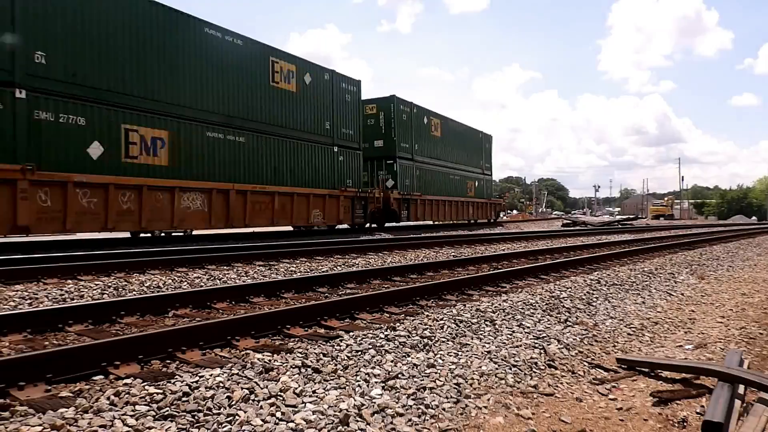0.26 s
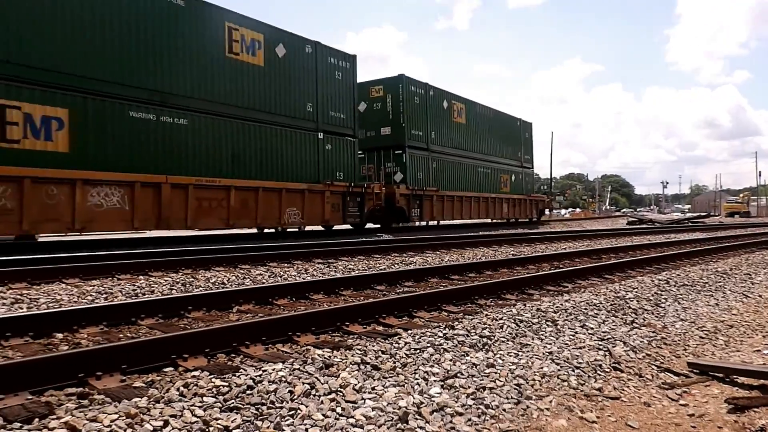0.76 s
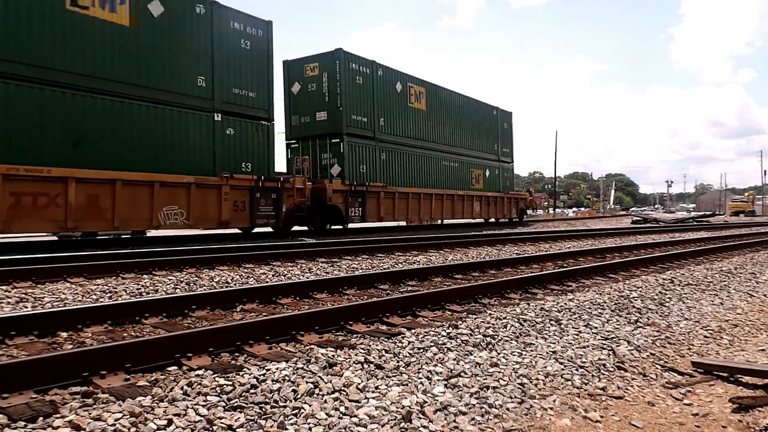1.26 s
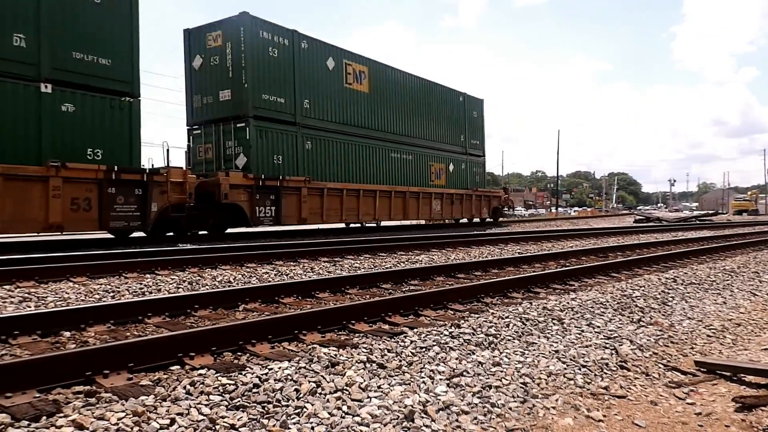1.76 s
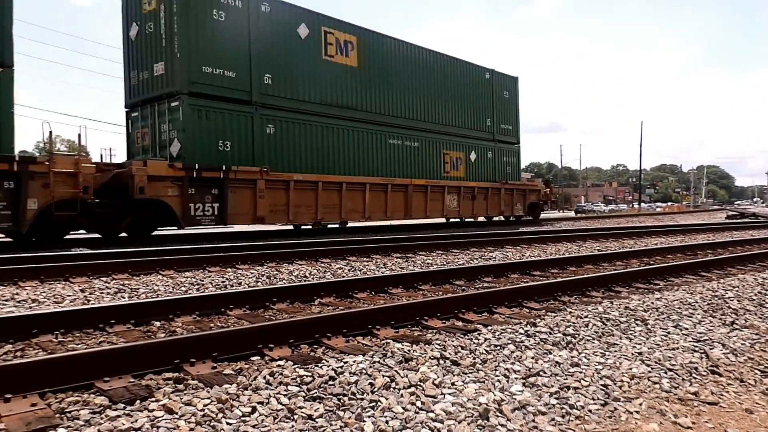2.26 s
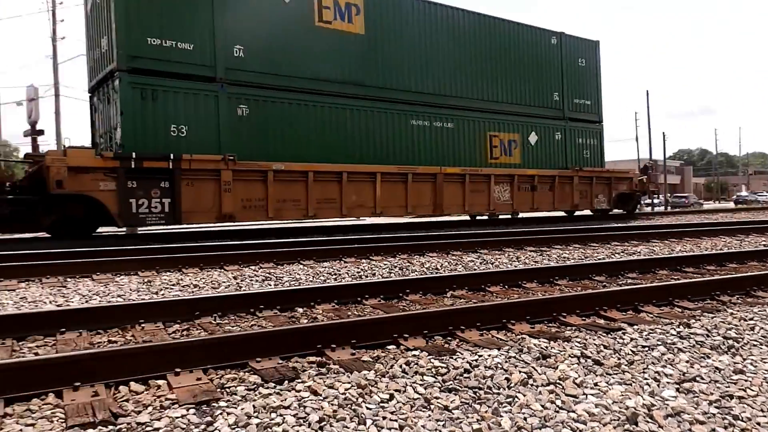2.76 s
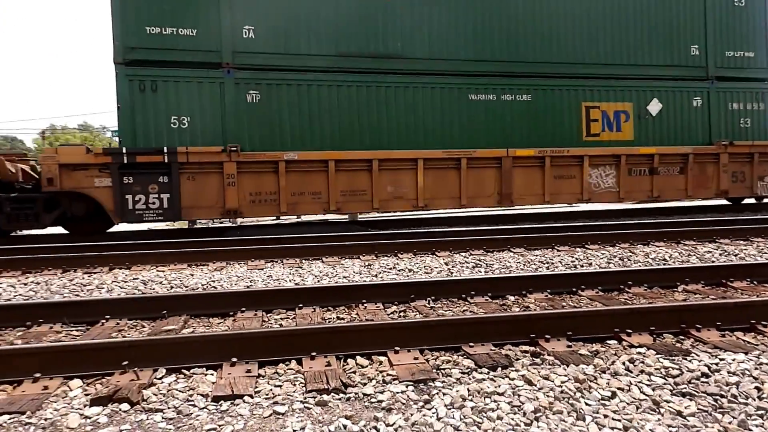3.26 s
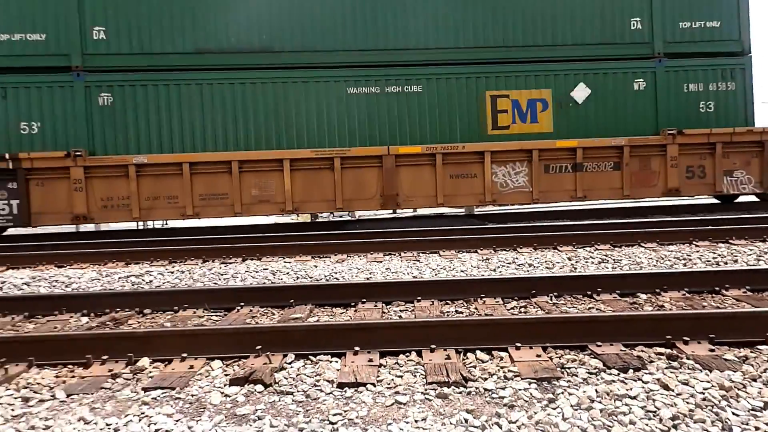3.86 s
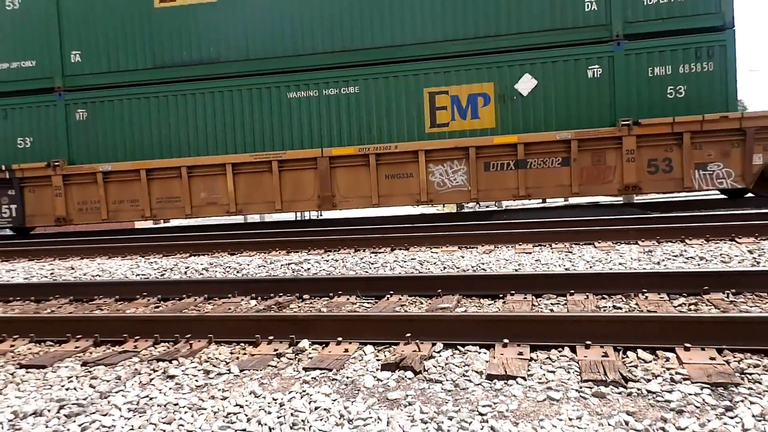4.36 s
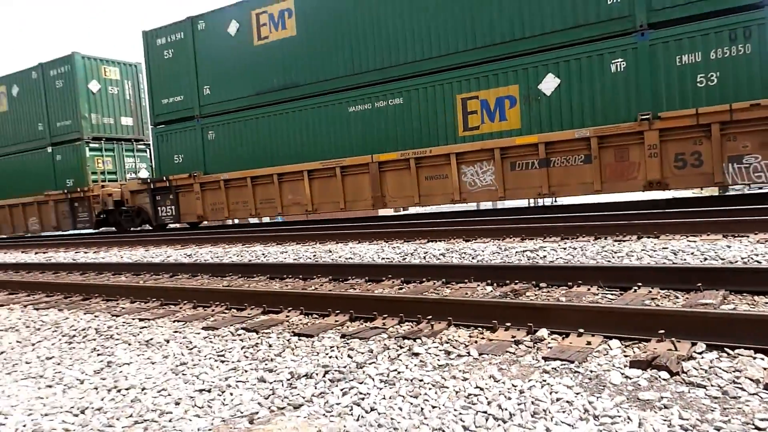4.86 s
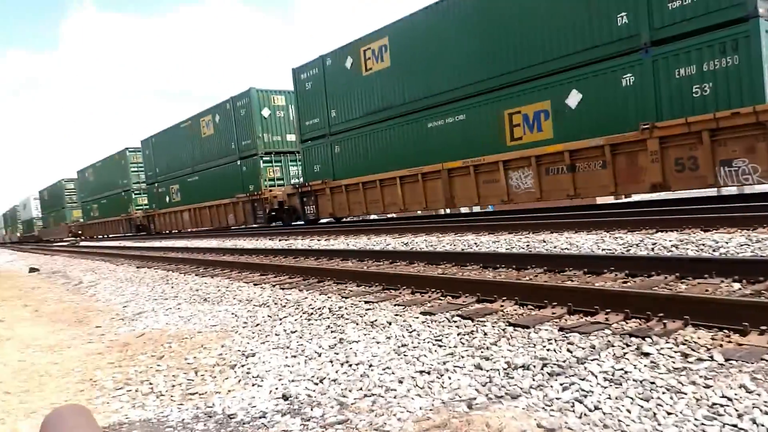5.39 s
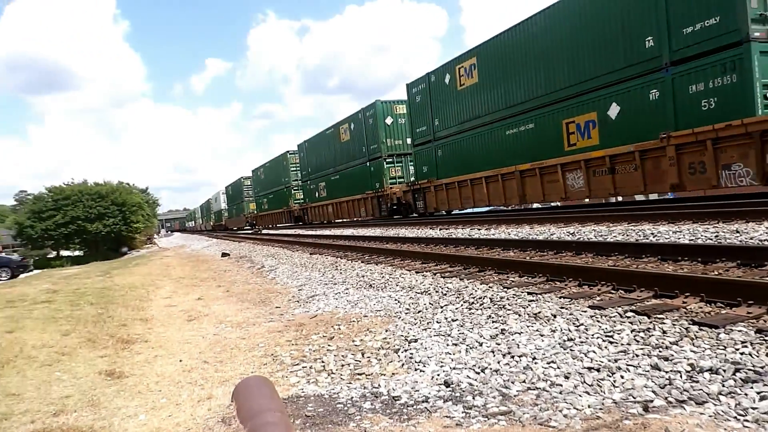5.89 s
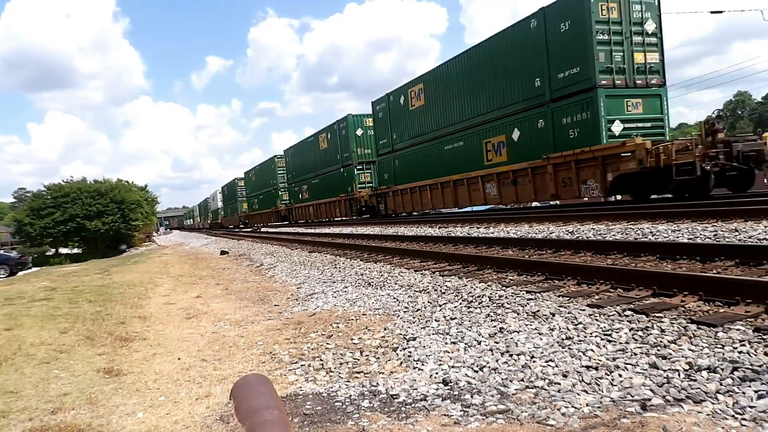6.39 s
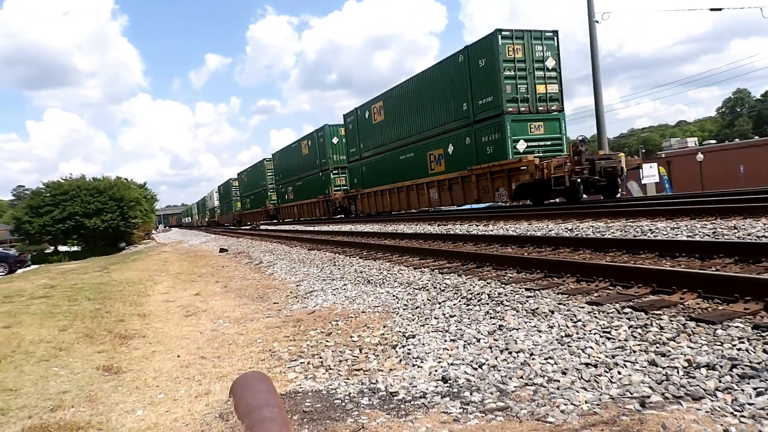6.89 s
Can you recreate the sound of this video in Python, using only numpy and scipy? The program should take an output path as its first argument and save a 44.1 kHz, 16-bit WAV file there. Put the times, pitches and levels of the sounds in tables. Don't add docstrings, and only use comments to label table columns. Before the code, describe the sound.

Close steel wheels screech through a curve in shifting overlapping tones, increasingly broken by blustery wind thumps, ending in faint scrape and gusts.

```python
import sys
import numpy as np
from scipy import signal
from scipy.fft import rfft, irfft, next_fast_len
from scipy.io import wavfile
from scipy.ndimage import uniform_filter1d, map_coordinates

SR = 44100
rng = np.random.default_rng(int(sys.argv[2]) if len(sys.argv) > 2 else 0)


def digitize_waveform(pressure):
    field = np.atleast_2d(pressure).T
    bounded = np.clip(field, -1, 1)
    quanta = np.round(bounded * 32767).astype(np.int16)
    wavfile.write(sys.argv[1], SR, quanta)


def gain_from_db(level_db):
    decades = np.asarray(level_db, float) / 20
    return 10 ** decades


N = 314860

# mode_hz, level_db
LEADING_MODES = [(1545, -33.5), (2019, -34.5), (2665, -34.5), (3257, -35.5), (3817, -41.5), (4183, -33),
                 (5706, -36.5), (6508, -38.5), (6837, -35.5), (7364, -36.5), (7736, -40), (8366, -38),
                 (9534, -38), (10471, -52), (11676, -66)]
FOLLOWING_MODES = [(2070, -39), (2640, -42), (3205, -39), (3854, -38), (4110, -37), (4395, -35),
                   (5600, -43), (5880, -35), (6336, -44), (6670, -36), (6900, -37), (7687, -38),
                   (8420, -42), (8580, -38), (9415, -36), (10265, -37), (11030, -48), (11750, -47),
                   (12651, -48), (13190, -43), (14373, -53), (15600, -54)]
# time_s, following_share_0_1, doppler_ratio, ringing_0_1
PASSING = [
    (0, .1, 1.017, 1),
    (1.2, .2, 1.015, 1),
    (2, .8, 1.009, 1),
    (3, .95, 1, 1),
    (5, .95, .98, .9),
    (5.4, .95, .977, .4),
    (6.4, .95, .975, .3),
    (6.55, .95, .974, .1),
    (7.14, .95, .974, .1),
]
# time_s, force_db
FLANGE_FORCE = [(0.0, -16.5), (0.45, -13), (0.7, -17.5), (1.3, -13.5), (1.6, -13.5), (1.92, -16),
                (2.6, -15), (3.15, -18.5), (3.34, -14), (3.54, -19), (4.1, -23.5), (4.25, -18.5),
                (4.8, -16.5), (5.5, -25), (6.0, -32.5), (6.4, -20.5), (6.6, -32.5), (7.13, -29)]
# time_s, over_slow_force_db
FORCE_SWINGS = [(0.82, 3.5), (1.2, 2), (2.29, -3.5), (5.38, 3.5), (5.67, 7.5), (5.86, 6.5), (6.16, 1),
                (6.38, -1), (6.51, 1), (6.6, -2), (6.67, 6), (6.94, 4), (7.1, -2)]
# time_s, turn_0_1
PORT_TURN = [(0.0, 0.22), (0.5, 0.01), (0.8, 0.17), (1.2, 0.07), (1.9, 0.34), (2.6, 0.08), (3.3, 0.21),
             (4.0, 0.11), (4.55, 0.5), (5.1, 0.11), (5.8, 0.49), (6.2, 0.5), (6.42, 0.65), (6.7, 0.7),
             (7.13, 0.84)]
# freq_hz, density_db_per_hz
ROLL_SPECTRUM = [(300, -18), (500, -21), (800, -10.5), (1200, -8), (1700, -4.5), (2200, -2), (2900, -7.5),
                 (4000, -20)]
GRIND_SPECTRUM = [(2200, -17.5), (3000, -1), (4200, 4.5), (4800, 4), (5400, 1.5), (6200, -0.5),
                  (7200, -9.5), (9500, -16.5)]
FIZZ_SPECTRUM = [(6000, -7), (7500, -1.5), (9000, -3), (11000, 2.5), (13000, -0.5), (15600, -7)]
# start_s,
# length_s, pitch_hz, level_db
SQUEALS = [(0.3, .14, 4190, -26), (0.7, .85, 3233, -26), (0.6, .31, 4166, -27), (0.78, .18, 1560, -29),
           (0.84, .29, 2667, -29), (1.13, .45, 1547, -25), (1.99, .8, 4130, -21.5),
           (2.2, .41, 3210, -30), (2.77, .25, 2143, -32), (2.44, .44, 4382, -20.5),
           (3.2, .6, 4349, -30), (3.6, .25, 3131, -34), (3.5, .25, 2602, -33), (3.6, .52, 4039, -23),
           (4.17, .5, 4029, -27), (4.4, .45, 2028, -29), (4.82, .31, 3128, -28), (4.72, .62, 4013, -26),
           (2.62, .3, 3860, -29), (0.05, .3, 1550, -33), (3.2, .2, 4385, -27), (4.17, .07, 2700, -30),
           (0.42, .3, 5710, -27), (0.47, .24, 6467, -30), (1.12, .18, 5720, -26),
               (1.31, .43, 7735, -27), (1.9, .36, 7702, -31), (2.45, .35, 7630, -32), (2.4, .36, 5872, -23),
               (2.5, .38, 6841, -29), (2.84, .19, 7689, -25), (2.97, .25, 5922, -30),
               (3.04, .13, 6932, -25), (3.07, .21, 7721, -32), (3.45, .3, 7532, -34),
               (3.33, .48, 5788, -29), (3.3, .31, 6652, -21), (4.14, .3, 7478, -35), (4.17, .39, 5816, -29),
               (4.3, .32, 6591, -27), (4.68, .46, 7455, -30), (0.3, .2, 7360, -28),
           (2.26, .67, 8554, -29), (2.3, .48, 13211, -30), (2.48, .28, 10328, -34),
                (2.43, .27, 9433, -30), (2.8, .33, 13137, -36), (2.82, .3, 9416, -26),
                (2.8, .58, 10255, -26), (2.95, .45, 8395, -32), (3.14, .28, 8497, -33),
                (3.36, .16, 10192, -27), (3.53, .21, 8412, -29), (3.79, .39, 10135, -26),
                (4.15, .55, 8360, -36), (4.22, .33, 10107, -32), (4.67, .15, 11415, -36),
                (4.74, .24, 8615, -31), (4.96, .15, 10078, -30),
           (5.16, .11, 4628, -34), (5.31, .17, 4548, -31), (5.3, .26, 2019, -36),
               (5.47, .14, 3140, -38), (5.62, .22, 4000, -34), (5.62, .3, 1990, -35),
               (5.64, .17, 7180, -40), (5.98, .22, 2470, -35), (6.18, .12, 4530, -32),
               (6.22, .16, 6600, -39), (6.12, .26, 3265, -35), (6.19, .1, 2840, -31),
               (6.18, .15, 1962, -29)]
# start_s, length_s, pitch_hz, level_db
CHIRPS = [(0.02, 0.06, 6630, -29), (0.12, 0.16, 3190, -29), (0.46, 0.07, 5710, -21),
          (0.46, 0.11, 6600, -27), (0.46, 0.18, 3170, -27), (0.56, 0.06, 4220, -25),
          (0.57, 0.07, 3990, -27), (0.82, 0.08, 3130, -27), (0.92, 0.09, 7750, -30),
          (0.94, 0.07, 2670, -25), (1.15, 0.1, 3110, -26), (1.15, 0.12, 6510, -27),
          (1.19, 0.14, 5630, -26), (1.42, 0.1, 3260, -26), (1.47, 0.07, 2010, -27),
          (1.5, 0.12, 2670, -26), (1.59, 0.06, 4440, -27), (1.61, 0.09, 3240, -27),
          (1.72, 0.17, 9550, -31), (1.76, 0.15, 2790, -29), (1.92, 0.15, 6910, -29),
          (1.92, 0.25, 8640, -32), (2.06, 0.08, 2000, -29), (2.35, 0.06, 3770, -29),
          (2.51, 0.09, 6000, -27), (2.67, 0.1, 3210, -29), (2.69, 0.1, 5980, -28),
          (2.69, 0.14, 7750, -30), (2.72, 0.14, 9410, -27), (2.77, 0.15, 5830, -29),
          (2.8, 0.13, 2090, -29), (2.89, 0.06, 4430, -26),
          (2.92, 0.19, 6740, -31), (3.0, 0.06, 4080, -29), (3.08, 0.12, 7680, -31),
               (3.09, 0.06, 6930, -24), (3.29, 0.1, 6770, -27), (3.3, 0.08, 4280, -26),
               (3.3, 0.21, 7550, -28), (3.43, 0.09, 10190, -25), (4.17, 0.08, 7470, -32),
               (4.18, 0.14, 2140, -33), (4.29, 0.07, 4020, -24), (4.51, 0.09, 4680, -29),
               (4.64, 0.06, 4010, -28), (4.65, 0.14, 5780, -31), (4.7, 0.32, 6680, -32),
               (4.72, 0.17, 8620, -26), (4.92, 0.07, 7450, -29), (4.99, 0.08, 10080, -28),
               (5.13, 0.16, 10060, -37), (5.14, 0.16, 6570, -34), (5.27, 0.07, 4620, -39),
               (5.34, 0.19, 3990, -33), (5.42, 0.06, 4540, -33), (5.43, 0.06, 3020, -37),
               (5.65, 0.11, 6080, -37), (5.68, 0.07, 3180, -33), (5.68, 0.13, 4540, -39),
               (5.73, 0.1, 3910, -41), (5.88, 0.07, 3210, -43), (5.89, 0.07, 2960, -39),
               (6.09, 0.28, 4640, -40), (6.5, 0.08, 4000, -44)]
# time_s, peak_db, swing_hz
POPS = [(2.187, -7.5, 455), (2.206, -4.5, 406), (2.927, -2, 372), (3.359, -4, 436), (3.453, -6.5, 390),
        (3.481, -5, 440), (3.535, -4.5, 390), (3.583, -5.5, 274), (3.895, -5.5, 403), (3.965, -1, 488),
        (4.057, -8, 383), (4.97, -11, 327), (5.197, -6, 304), (5.22, -6, 373), (5.252, -10, 181),
        (5.285, -1.5, 271), (5.297, -0.5, 302), (5.424, -1.5, 287), (5.474, -7.5, 275), (5.653, -4, 252),
        (5.698, -10, 317), (5.711, -1.5, 305), (5.769, 1, 327), (5.814, -3.5, 296), (5.858, -2, 318),
        (6.077, -2.5, 332), (6.439, -13, 244), (6.459, 0, 249), (6.537, -2.5, 352), (7.059, 2, 300),
        (1.206, -17, 243), (1.443, -15, 218), (1.518, -18, 294), (2.134, -13, 300),
                  (2.215, -14, 310), (2.373, -15, 357), (2.394, -11, 330), (2.414, -13, 279),
                  (2.434, -16, 268), (2.448, -12, 310), (2.458, -11, 363), (2.473, -15, 273),
                  (2.522, -11, 259), (2.532, -14, 284), (2.75, -20, 182), (2.873, -13, 290),
                  (2.892, -11, 536), (2.917, -10, 347), (2.937, -4, 558), (3.005, -10, 306),
                  (3.042, -10, 344), (3.215, -13.5, 261), (3.316, -6, 560), (3.325, -5, 544),
                  (3.338, -20, 311), (3.35, -16, 353), (3.398, -9, 377), (3.512, -13, 306),
                  (3.544, -8, 500), (3.575, -12, 344), (3.593, -6, 522), (3.69, -16, 253), (3.698, -8, 277),
                  (3.795, -9, 382), (3.807, -12, 308), (3.852, -16, 423), (3.879, -19, 292),
                  (3.905, -8, 350), (3.939, -12, 272), (4.012, -5, 326), (4.036, -22, 343),
                  (4.079, -13, 300), (4.091, -14, 452), (4.114, -10, 288), (4.131, -8, 437),
                  (4.138, -12, 259), (4.152, -5, 507), (4.165, -7, 419), (4.199, -6, 272),
                  (4.245, -11, 496), (4.253, -8, 400), (4.267, -12, 507), (4.296, -15, 312),
                  (4.306, -8, 532), (4.373, -16, 388), (4.409, -10.5, 387), (4.694, -7.5, 400),
                  (4.832, -13, 207), (4.841, -15, 511), (4.851, -7, 370),
        (4.875, -10, 388), (4.912, -9, 241), (4.925, -5.5, 553), (4.943, -9, 278),
                 (4.987, -8, 217), (5.011, -7.5, 358), (5.033, -9, 281), (5.045, -13, 277),
                 (5.063, -11, 297), (5.089, -9, 257), (5.108, -4, 376), (5.125, -6, 247), (5.135, -17, 250),
                 (5.151, -15, 216), (5.175, -12, 277), (5.182, -17, 395), (5.23, -10, 200),
                 (5.239, -12, 304), (5.272, -4, 257), (5.325, -11, 251), (5.364, -17, 209),
                 (5.382, -14, 300), (5.411, -12, 252), (5.44, -23, 285), (5.458, -6, 200),
                 (5.486, -22, 252), (5.498, -9, 282), (5.508, -6, 377), (5.517, -6.5, 314),
                 (5.535, -9, 264), (5.568, -7, 181), (5.577, -11, 302), (5.598, -12, 213), (5.61, -11, 215),
                 (5.626, -6, 312), (5.663, -5.5, 275), (5.678, -12, 270), (5.686, -8, 367), (5.73, -3, 305),
                 (5.739, -7, 308), (5.757, -10, 282), (5.78, -15, 382), (5.802, -5, 313), (5.893, -14, 226),
                 (5.905, -14, 336), (5.922, -8, 338), (6.206, -12, 222), (6.318, -13, 228),
                 (6.359, -9, 236), (6.381, -8, 239), (6.568, -19, 185), (6.586, -8, 238), (6.602, -17, 281),
                 (6.733, -15, 232), (6.808, -7.5, 223), (6.948, -14, 310), (6.974, -18, 186),
                 (7.013, -21, 260), (7.043, -15, 256), (7.072, -11, 274)]
# peak_s, peak_db, rise_s
GUSTS = [(1.3, -49, 0.69), (1.98, -27.5, 0.083), (2.199, -18, 0.065), (2.4, -30, 0.037),
         (2.5, -25.5, 0.081), (2.93, -22, 0.042), (3.03, -33, 0.087), (3.21, -34, 0.036), (3.34, -26, 0.11),
         (3.48, -14, 0.059), (3.69, -17.5, 0.041), (3.93, -22, 0.3), (4.07, -18, 0.15), (4.25, -25, 0.32),
         (4.68, -32, 0.086), (4.97, -16.5, 0.099), (5.119, -15, 0.062), (5.23, -12, 0.11),
         (5.47, -13.5, 0.082), (5.58, -26, 0.077), (5.7, -19.5, 0.18), (5.91, -20, 0.067),
         (6.25, -26.5, .2), (6.4, -19, 0.17), (6.45, -15, 0.036), (6.75, -35, 0.27), (7.0, -23.5, 0.13),
         (7.06, -12.5, 0.047)]
# freq_hz, density_db_per_hz
BUFFET_SPECTRUM = [(35, -47), (60, -10), (144, 0.5), (334, -2.5), (691, -13), (899, -18), (1070, -23),
                   (1200, -26), (1560, -45), (2640, -120)]
# freq_hz, density_db_per_hz
RUMBLE_SPECTRUM = [(13, -57), (22, -28), (58, -9.5), (134, 0.5), (258, -9), (370, -16.5), (422, -14.5),
                   (700, -20.5), (910, -24), (1540, -120)]
LOST_SINGLE = [.531, .592, 1.065, 1.257, 1.321, 1.469, 1.576, 2.557, 2.813, 3.111, 3.622, 3.689, 3.75,
               3.924, 4.029, 4.2, 4.969, 5.117, 5.245, 5.396, 5.907, 6.206, 6.377, 6.931]
LOST_DOUBLE = [
    .84,
    2.719,
]


def unit(x):
    return x / np.sqrt(np.mean(x ** 2) + 1e-20)


def curves(rows):
    time_s, *columns = np.transpose(rows)
    return [np.interp(np.arange(N) / SR, time_s, column) for column in columns]


def slow(rule):
    t = np.arange(0, N / SR + .002, .002)
    return np.interp(np.arange(N) / SR, t, rule(t))


def wobble(rate_hz, size=N):
    knots = rng.standard_normal(2000)
    return map_coordinates(knots, [np.arange(size) * rate_hz / SR], mode="wrap")


def filtered(x, response):
    size = next_fast_len(N + 8192)
    gain = response(np.fft.rfftfreq(size, 1 / SR))
    return irfft(rfft(x, size) * gain, size)[:N]


def coloured(x, points):
    f, db = np.transpose(points)
    return unit(filtered(x, lambda hz: gain_from_db(np.interp(np.log(hz + 1), np.log(f), db, -120, -120))))


def patchy(depth_db, bins, frames):
    z = signal.stft(rng.standard_normal(N + 512), nperseg=512)[2]
    field = uniform_filter1d(rng.standard_normal(z.shape), bins, axis=0)
    field = uniform_filter1d(field, frames, axis=1)
    return signal.istft(z * gain_from_db(depth_db * unit(field)), nperseg=512)[1][:N]


def rolling_wheels():
    force_db, turn = flange_force_db(), curves(PORT_TURN)[0]
    swing_db = force_db - uniform_filter1d(force_db, SR)
    roll_db = -6.5 + 15.5 * turn - 0.31 * swing_db
    fizz_db = -2.5 - 10 * turn
    share, ratio, ringing = curves(PASSING)
    leading = wheel_set(LEADING_MODES, width_hz=84, floor_db=-6, tilt_db=4.5)
    following = wheel_set(FOLLOWING_MODES, width_hz=75, floor_db=-10, tilt_db=4)
    following = map_coordinates(following, [np.cumsum(ratio)], mode="mirror")
    steel = np.sqrt(1 - share) * leading + np.sqrt(share) * following
    scrape = unit(patchy(depth_db=1.3, bins=4, frames=20))
    steel = np.sqrt(ringing) * steel + np.sqrt(1 - ringing) * scrape
    sound = gain_from_db(roll_db) * coloured(steel, ROLL_SPECTRUM) + coloured(steel, GRIND_SPECTRUM)
    sound += gain_from_db(fizz_db + 0.66 * wobble(16)) * coloured(steel, FIZZ_SPECTRUM)
    total = np.sqrt(1 + gain_from_db(2 * roll_db) + gain_from_db(2 * fizz_db))
    return gain_from_db(force_db - 2.5 + 0.32 * wobble(20)) * sound / total


def wheel_set(modes, width_hz, floor_db, tilt_db):
    def power(f):
        total = gain_from_db(2 * floor_db)
        for mode_hz, db in modes:
            height = gain_from_db(2 * (db + 38.5 + tilt_db * np.log2(mode_hz / 4000)))
            total = total + height / (1 + (2 * (f - mode_hz) / width_hz) ** 2)
        return total
    friction = patchy(depth_db=3.0, bins=3, frames=30)
    return unit(filtered(friction, lambda f: np.sqrt(power(f))))


def flange_force_db():
    swing_s = 0.056
    swings = slow(lambda t: sum(db * np.exp(-((t - s) / swing_s) ** 2) for s, db in FORCE_SWINGS))
    return curves(FLANGE_FORCE)[0] + swings


def squeals():
    catch_s = .047
    out = np.zeros(N + SR)
    events = SQUEALS + CHIRPS
    for start, length, hz, db in events:
        top, end = start + 0.5 * length, start + length
        t = np.arange(max(start - catch_s, 0), end + catch_s, 1 / SR)
        knots_s = [start - catch_s, start, top, end, end + catch_s]
        swell_db = np.interp(t, knots_s, [-59, -3.0, 1.0, -5.0, -48])
        pitch_hz = hz * (1 - .008 * (t - (start + end) / 2)) + 40000 / hz * wobble(60, len(t))
        tone = np.sin(2 * np.pi * np.cumsum(pitch_hz) / SR)
        level_db = db - 2.6 + 0.17 * np.log2(hz / 6000) + swell_db + 2.6 * wobble(65, len(t))
        out[round(t[0] * SR):][:len(t)] += np.sqrt(2) * gain_from_db(level_db) * tone
    return out[:N]


def wind():
    lump_db = 9.0 * np.tanh(.7 * wobble(90))
    lumps = unit(gain_from_db(lump_db) * coloured(rng.standard_normal(N), BUFFET_SPECTRUM))
    return wind_pops() + gain_from_db(-2) * gust_gain() * lumps


def wind_pops():
    out, t = np.zeros(N + SR), np.arange(-.012, .02, 1 / SR)
    for s, db, hz in POPS:
        cycles, weak_db = t * hz, max(-db, 0)
        lean = rng.normal(0, 0.3 + 0.07 * weak_db)
        decay = np.exp(-abs(cycles / (0.5 + 0.02 * weak_db)) ** 1.47)
        swing = np.cos(2 * np.pi * cycles + lean) * decay
        tip = 0.8 * gain_from_db(-0.5 * weak_db) * np.exp(-(cycles / 0.07) ** 2)
        out[round((s - .012) * SR):][:len(t)] -= gain_from_db(db - 5.5) * (swing + tip)
    return filtered(out[:N], lambda hz: 1 / (1 + (95 / (hz + 1)) ** 4))


def gust_gain():
    calm_db, climb_db, fall_over_rise = -37.5, 14, 0.89

    def slope_db(t, peak_s, peak_db, rise_s):
        away_s = np.maximum(peak_s - t, (t - peak_s) / fall_over_rise)
        return peak_db - climb_db * away_s / rise_s
    gust_db = slow(lambda t: np.max([slope_db(t, *gust) for gust in GUSTS], axis=0))
    return np.hypot(gain_from_db(calm_db), gain_from_db(gust_db))


def scuff():
    centre_s, half_s, level_db, centre_hz = 6.4, 0.064, -24, 1100
    t = np.arange(N) / SR
    band = filtered(rng.standard_normal(N), lambda hz: np.exp(-np.log((hz + 1) / centre_hz) ** 2))
    return gain_from_db(level_db) * np.exp(-((t - centre_s) / half_s) ** 4) * unit(band)


def car_rumble():
    level_db = -32 + 5.5 * curves(PORT_TURN)[0] + .9 * wobble(15)
    return gain_from_db(level_db) * coloured(rng.standard_normal(N), RUMBLE_SPECTRUM)


def scene():
    return np.tile(rolling_wheels() + squeals() + wind() + scuff() + car_rumble(), (2, 1))


def ducked(x):
    threshold_db, duck_share, attack_s, recovery_db_per_s = -17.5, 0.51, 0.0067, 110
    pressure = abs(filtered(x, lambda hz: hz < 800))
    level_db = 20 * np.log10(abs(uniform_filter1d(pressure, size=128)) + 1e-6)
    back_db = recovery_db_per_s * np.arange(N) / SR
    over_db = np.maximum.accumulate(np.maximum(level_db - threshold_db, 0) + back_db) - back_db
    lag = round(attack_s * SR)
    return x * gain_from_db(-duck_share * uniform_filter1d(np.pad(over_db, (lag, 0))[:N], lag))


def bridged(x):
    frame, fine = 1024, 8
    size = 2 * fine * frame
    out = x.copy()
    for s in LOST_SINGLE + LOST_DOUBLE:
        half = frame * (3 if s in LOST_DOUBLE else 2) // 2
        mid, k = round(s * SR), np.arange(-half, half)
        around = x[mid - frame:mid + frame] * np.hanning(2 * frame)
        z = rfft(np.roll(np.pad(around, (0, size - 2 * frame)), -frame))
        tops = signal.find_peaks(abs(z), distance=110)[0]
        tops = tops[np.argsort(abs(z[tops]) * (tops + 900) ** .25)[-10:]]
        bass = np.argmax(abs(z[:round(160 * size / SR)]))
        tops = np.union1d(tops, bass)
        held = np.real(z[tops] @ np.exp(2j * np.pi * np.outer(tops, k) / size))
        held *= gain_from_db(-3.0) * x[mid + k].std() / held.std()
        fade = np.clip((half - abs(k)) / frame, 0, 1)
        out[mid + k] = (1 - fade) ** 0.63 * x[mid + k] + fade ** 0.47 * held
    return out


def low_pass(x):
    return signal.sosfilt(signal.butter(12, 16290, fs=SR, output="sos"), x)


def record(dry):
    top_hz, notch_hz, half_width_hz = 15750, 5015, 95
    notch = lambda hz: (hz < top_hz) * (1 - .93 / (1 + ((hz - notch_hz) / half_width_hz) ** 2))
    x = bridged(ducked(filtered(dry[0], notch)))
    x = x / (1 + abs(x / .9) ** 6) ** (1 / 6)
    mix = np.array([x, x])
    return low_pass(mix)


dry = scene()
out = record(dry)
digitize_waveform(out)
```